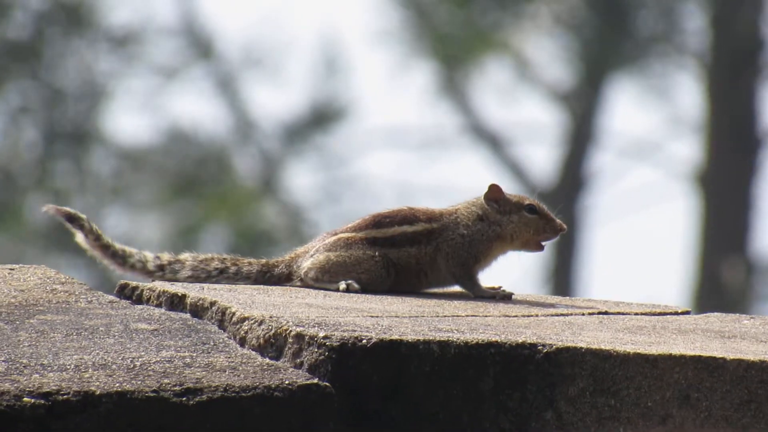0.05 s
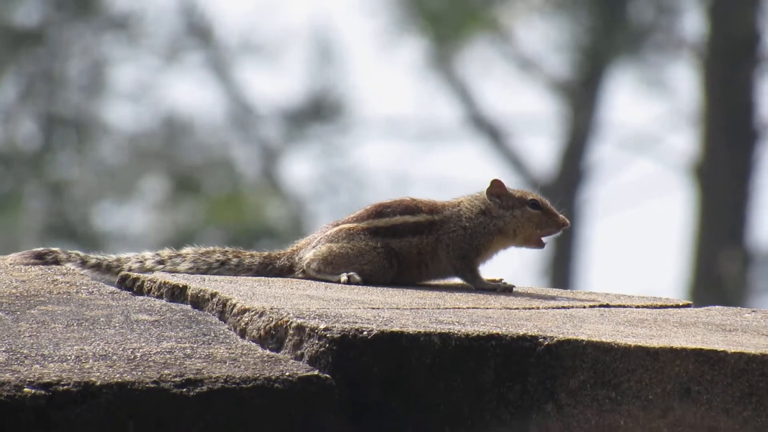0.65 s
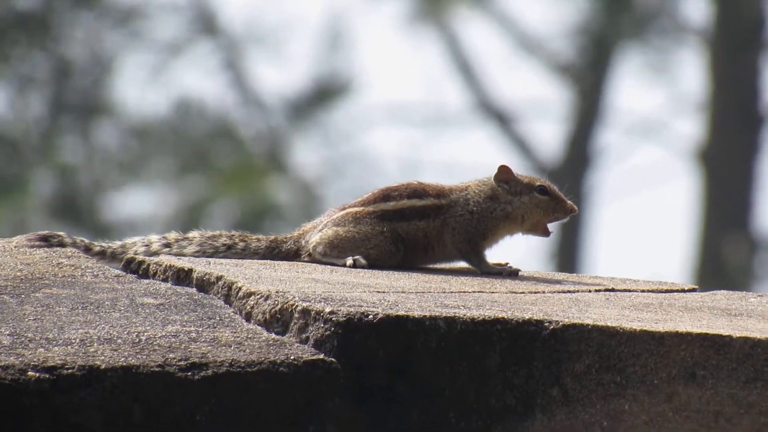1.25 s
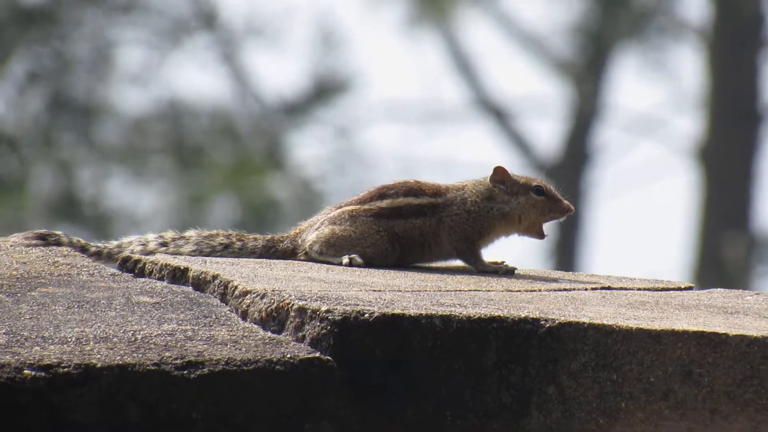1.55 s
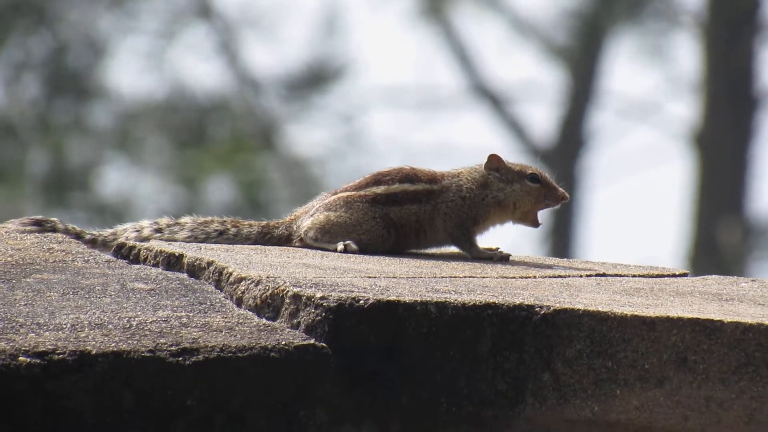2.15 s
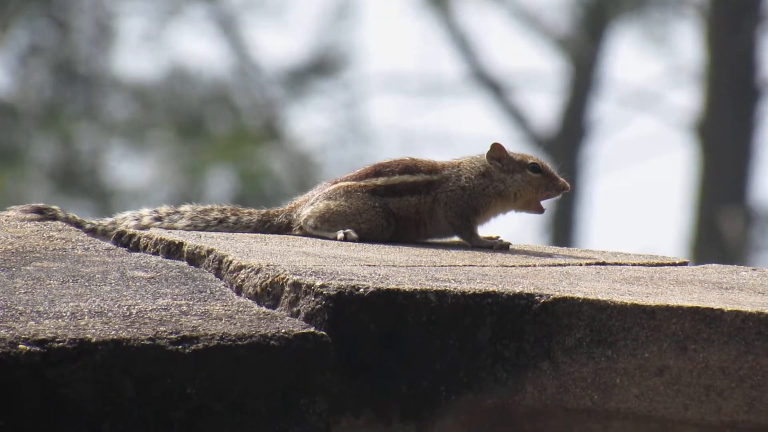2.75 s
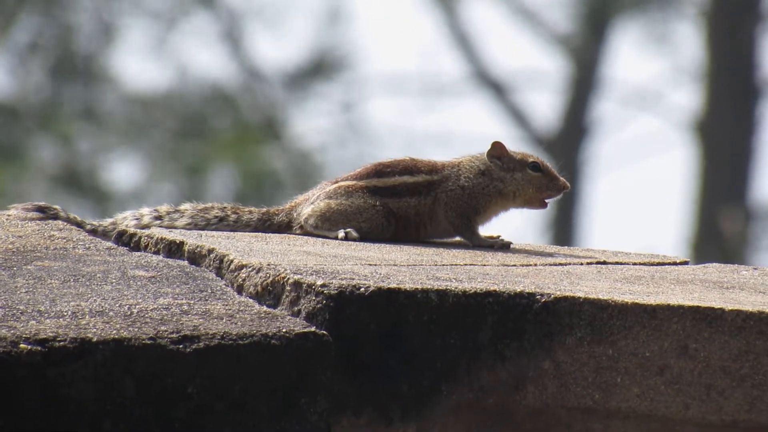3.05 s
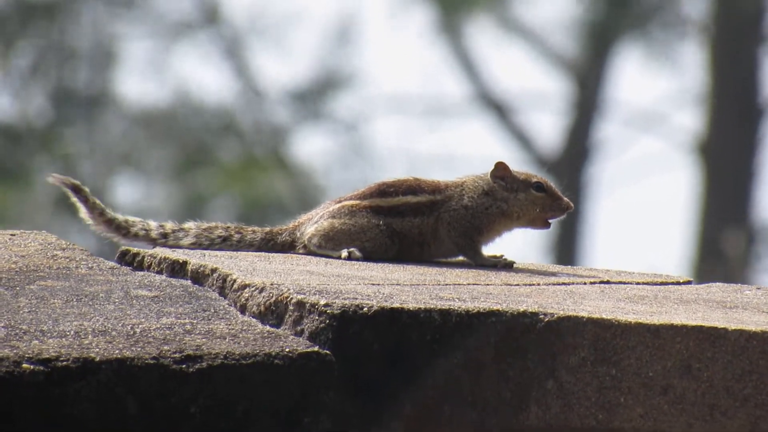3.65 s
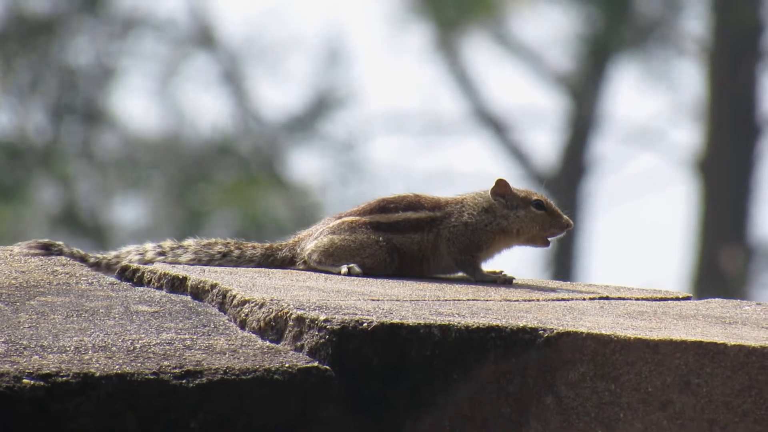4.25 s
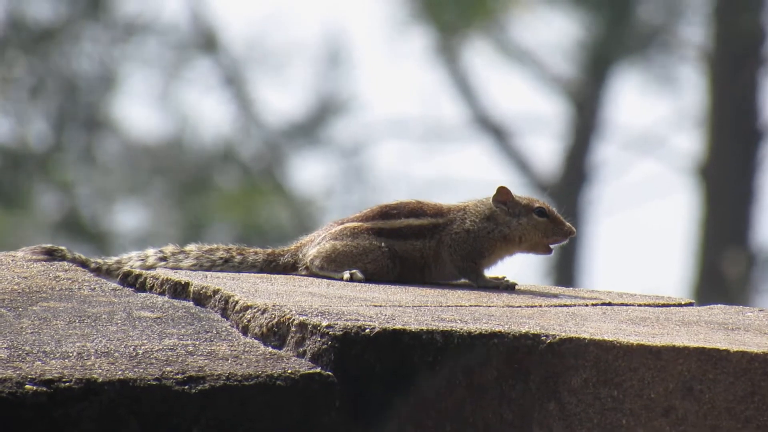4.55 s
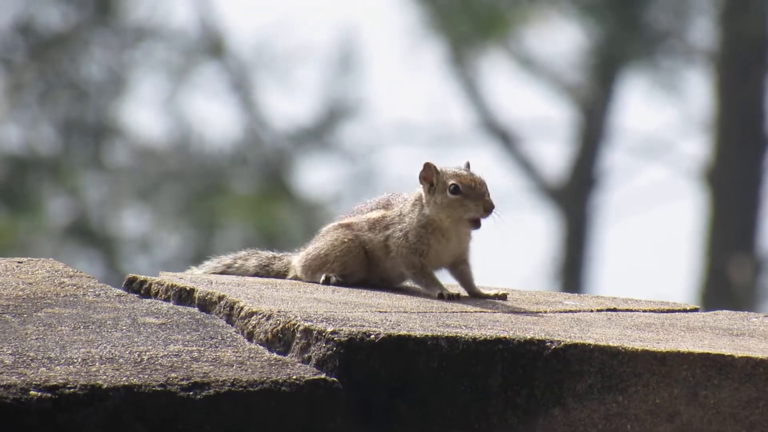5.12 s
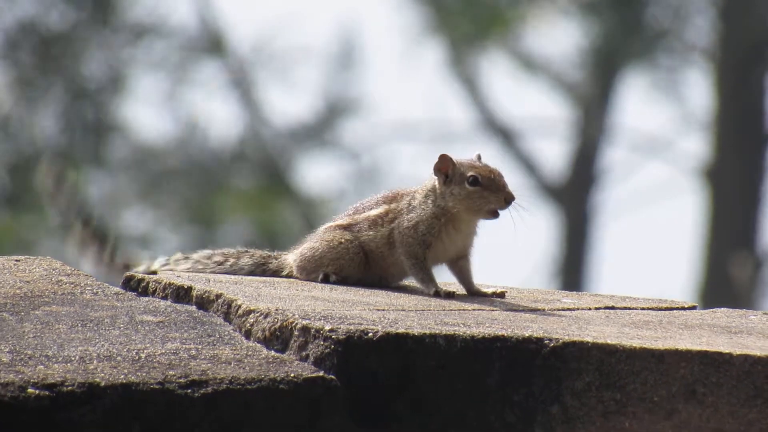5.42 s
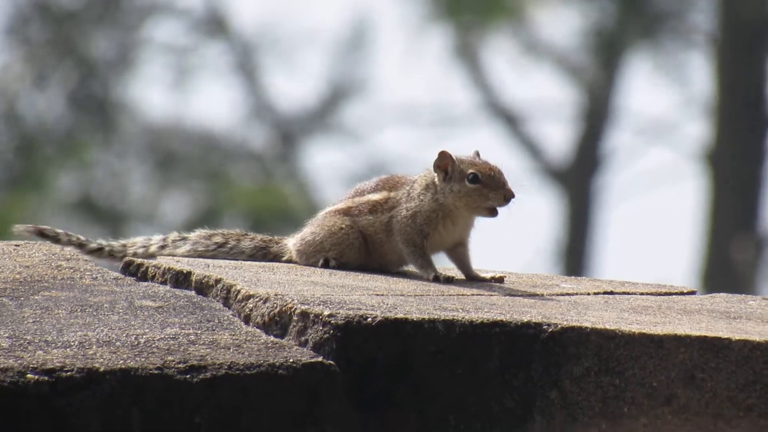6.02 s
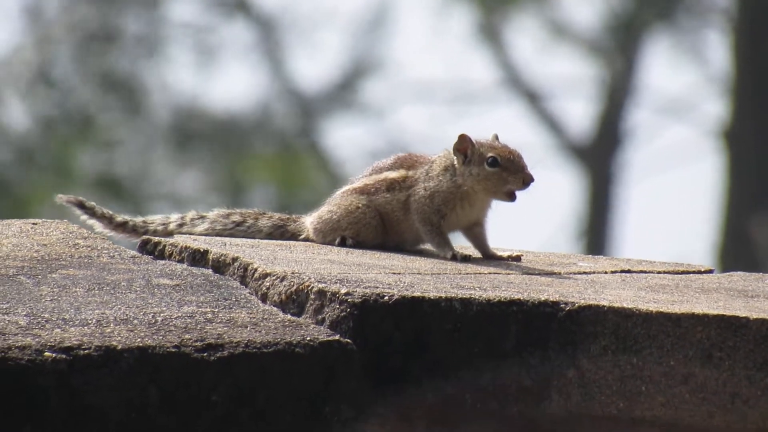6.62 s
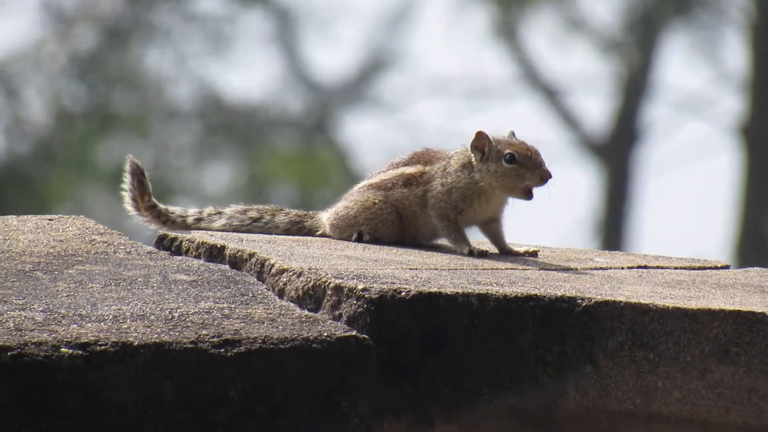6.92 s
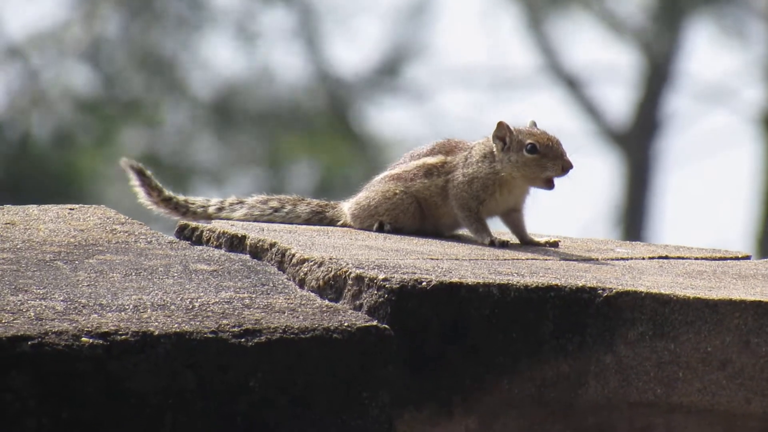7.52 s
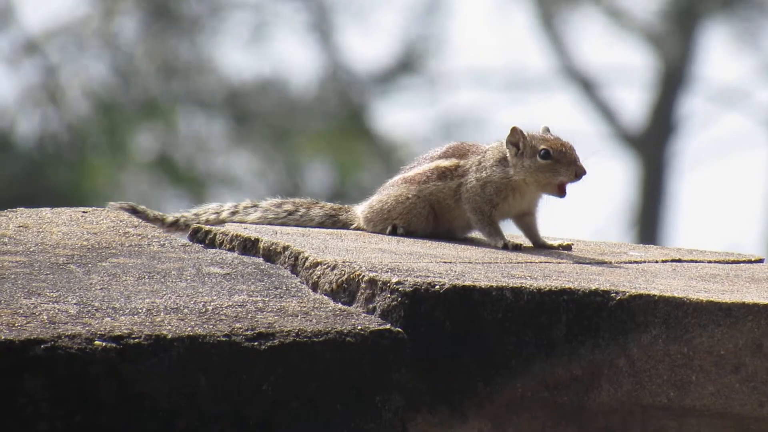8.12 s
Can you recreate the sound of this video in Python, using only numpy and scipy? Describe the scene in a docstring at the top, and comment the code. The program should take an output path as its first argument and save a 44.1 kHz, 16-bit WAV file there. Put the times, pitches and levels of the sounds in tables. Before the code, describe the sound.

High-pitched squirrel chirps repeat about three times a second over gusty wind rumble and a soft hiss.

```python
"""Palm squirrel in gusty wind

A palm squirrel on a stone ledge whistles about three chirps a second, each trailed by a faint squeak,
two of them by a sharp chip. Walls and trees reflect the calls; a far bird twitters, and three dry ticks
sound. Turbulent gusts buffet the microphone of a hissing, faintly whining camera."""
import sys
import numpy as np
from scipy import signal
from scipy.fft import rfft, irfft, next_fast_len
from scipy.io import wavfile

SR = 44100
rng = np.random.default_rng(int(sys.argv[2]) if len(sys.argv) > 2 else 0)


def persist_wave(psi):
    """Save psi, clipped to +-1, as 16-bit WAV."""
    counts = np.round(np.clip(psi, -1, 1) * 32767).astype(np.int16)
    wavfile.write(sys.argv[1], SR, np.atleast_2d(counts).T)


N = 369116

# Whistles. Each row: start in seconds, length in seconds, pitch in Hz, crest level in dB,
# closing fall as a fraction of the pitch.
WHISTLES = [(-0.025, .042, 4290, -37.5, 0.064), (0.265, 0.061, 4225, -42, 0.023),
            (.594, 0.06, 4232, -44, .014), (0.946, 0.046, 4120, -53.5, .03),
            (1.208, 0.058, 4204, -47.5, 0.012), (1.53, 0.058, 4176, -44, 0.013),
            (1.857, 0.061, 4162, -45.5, 0.036), (2.15, 0.062, 4186, -44.5, 0.034),
            (2.463, 0.064, 4200, -45, 0.035), (2.803, 0.06, 4164, -47, 0.0054),
            (3.145, .05, 4160, -52, .013), (3.475, 0.055, 4150, -51.5, 0.0044),
            (3.845, 0.041, 4140, -51.5, .006), (4.139, 0.058, 4225, -47.5, 0.044),
            (4.477, 0.052, 4190, -45.5, 0.051), (4.774, 0.057, 4365, -38, 0.13),
            (5.18, 0.054, 4435, -40, 0.19), (5.568, .05, 4340, -41, 0.145),
            (5.876, 0.066, 4250, -42.5, .083), (6.196, .063, 4237, -44, 0.062),
            (6.529, 0.058, 4200, -44, 0.047), (6.878, 0.052, 4110, -49, 0.023),
            (7.202, 0.04, 4074, -44.5, 0.017), (7.47, 0.056, 4180, -43, 0.071),
            (7.764, 0.064, 4194, -41.5, 0.059), (8.08, 0.06, 4186, -41, 0.039)]
# Reflections from hard surfaces. Each row: delay in seconds, gain in dB.
REFLECTIONS = [(.02001, -6), (.02743, -12), (.039, -19), (.067, -24)]
# Gusts. Each row: start in seconds, length in seconds, relative opening level in dB.
WIND_GUSTS = [(0.238, .3, -27), (0.63, 0.18, -33), (1.011, 0.15, -33.5), (1.35, .17, -31.5), (2, .13, -40),
              (2.305, 0.18, -38.5), (3.386, 0.15, -23.5), (3.965, 0.15, -26.5), (4.175, 0.38, -33),
              (4.542, 0.32, -29), (5.09, 0.28, -27), (5.513, 0.31, -34), (5.754, 0.23, -25),
              (6.089, 0.24, -19.5), (6.362, 0.21, -26.5), (6.72, 0.082, -32), (7.006, 0.073, -27),
              (7.409, 0.14, -17.5), (7.612, 0.31, -29)]
# Sudden buffets. Each row: time of the peak in seconds, relative level in dB.
WIND_BUFFETS = [(.245, -44), (.663, -29), (1.025, -39), (2.398, -27), (3.434, -18), (4.048, -22.5),
                (4.255, -32), (4.788, -32.5), (5.217, -20), (6.284, -17), (7.503, -25), (7.779, -20.5)]
# Bird notes. Each row: start and length in seconds, first and last nominal pitch in Hz, relative dB.
BIRD_NOTES = [(1.175, 0.035, 3580, 3600, -68), (1.298, 0.029, 3190, 3050, -63),
              (1.388, 0.037, 2920, 2700, -69), (1.456, 0.036, 2190, 2010, -68),
              (2.918, 0.047, 2130, 2420, -67), (2.953, 0.044, 2260, 2590, -63),
              (3.186, .03, 2540, 2350, -67), (3.257, 0.038, 2390, 2640, -65), (3.379, .03, 2740, 2710, -71),
              (3.412, 0.041, 2425, 2550, -67), (5.477, 0.064, 1910, 2670, -70)]
# Dry ticks. Each row: start in seconds, level in dB.
DRY_TICKS = [(4.41, -46.5), (4.451, -43.5), (4.994, -50.5)]
# Sharp chips. Each row: start in seconds, length in seconds, pitch in Hz, relative level in dB.
SHARP_CHIPS = [(4.889, 0.0124, 3486, -35.5), (5.2923, 0.013, 3560, -37)]

# Harmonic series. Each row: multiple of the pitch, relative level in dB.
SQUEAK_PARTIALS = [(1, 0), (2, -14), (3, 0), (4, -12), (5, -12), (6, -14)]
CHIP_PARTIALS = [(1, -6), (2, -5.5), (3, -20), (4, -26)]

# Noise spectra. Each row: frequency in Hz, relative level in dB.
COMMON_HISS = [(12, -16), (20, -6.5), (217, -4), (270, -7), (302, -7.5), (337, -7.5), (511, -13.5),
               (693, -16.5), (1020, -17), (2280, -25.5), (4080, -31.5), (4430, -32.5), (6360, -32),
               (15000, -35.5)]
OPPOSED_HISS = [(12, -25), (20, -5.5), (49, -9.5), (87, -13), (118, -20), (178, -7.5), (235, -9), (278, -9),
                (525, -15.5), (674, -23), (940, -22), (3270, -48), (15000, -48.5)]
LARGE_EDDIES = [(15, -25), (40, 2), (90, 5.5), (150, 0), (250, -11.5), (400, -23), (600, -37), (1000, -46),
                (3000, -82)]
SMALL_EDDIES = [(30, -9.5), (170, 7.5), (330, -5), (500, -18), (900, -45), (3000, -74)]
SQUEAK_RASP = [(1000, -4), (1600, 9.5), (2500, -11), (4700, 9.5), (5800, -43), (7200, -5), (9800, 0),
               (14000, -31)]
TICK_SPECTRUM = [(500, -30), (1200, -5), (1750, 4), (2400, -14), (3200, -14), (5500, -19), (10000, -37),
                 (15000, -35)]
CHIP_RASP = [(1500, -34), (2500, -1.5), (4800, -4), (6000, -12), (7200, 2.5), (9000, -14), (14000, -20)]


def amp(db):
    """Amplitude grows tenfold for every 20 dB."""
    return 10 ** (np.asarray(db) / 20)


def unit(x):
    """Normalisation to an rms of 1."""
    return x / np.sqrt(np.mean(x ** 2) + 1e-20)


def add(mix, start, sound):
    """Superposition: a sound joins the mix at a start time in seconds."""
    first = round(start * SR)
    sound = sound[max(-first, 0):]
    part = mix[max(first, 0):][:len(sound)]
    part += sound[:len(part)]


def noise(spectrum):
    """Spectral shaping turns white noise into coloured noise of rms 1."""
    hz, db = np.transpose(spectrum)
    gain = amp(np.interp(np.log(np.fft.rfftfreq(N, 1 / SR) + 1), np.log(hz), db))
    return unit(irfft(rfft(rng.standard_normal(N)) * gain, N))


def wander(rate_hz):
    """Low-pass filtering turns noise into a smooth fluctuation of rms 1."""
    gain = np.exp(-(np.fft.rfftfreq(N, 1 / SR) / rate_hz) ** 2)
    return unit(irfft(rfft(rng.standard_normal(N)) * gain, N))


def course(length):
    """Normalised time, from 0 to 1 over one note."""
    return np.arange(0, length, 1 / SR) / length


def under(x, start, note):
    """Time windowing: the part of a long signal that lies under a note."""
    return np.take(x, round(start * SR) + np.arange(len(note)), mode="wrap")


def voice(hz, partials):
    """Additive synthesis: partials (multiple, dB rms) follow one phase, the integral of frequency."""
    phase = 2 * np.pi * np.cumsum(hz) / SR
    return np.sqrt(2) * sum(amp(db) * np.sin(k * phase) for k, db in partials)


def spread(mid, side):
    """Left and right are the sum and difference of a common and an opposed part."""
    return np.array([mid + side, mid - side])


def chirps(calm_hz=4240, shrill_hz=4407, attack_s=.005, crest_s=.041, release_s=.006):
    """Harmonic whistles swell, hold and drop; strain at high pitch brings jitter and period doubling."""
    out, tremble, flutter = np.zeros(N), wander(rate_hz=410), wander(rate_hz=130)
    for start, length, hz, db, fall in WHISTLES:
        u = course(length)
        t = u * length
        strain = np.clip((hz - calm_hz) / (shrill_hz - calm_hz), 0, 1) ** 2
        scoop = (.012 + .094 * strain) * np.exp(-t / .00856)  # a strained chirp starts lower
        sag = fall * np.exp((u - 1) / (.0826 + fall))  # a deeper fall starts sooner
        jitter = (.0004 + .0073 * strain) * under(tremble, start, u)
        doubling_db = -21 + 20 * np.log10(strain + 1e-3)
        octave_db = -4 - .18 * (db + 46.5) - 3 * strain  # louder chirps are purer
        third_db = octave_db - 19 + strain
        partials = [(1, 0), (2, octave_db), (3, third_db), (.5, doubling_db - 12.5), (1.5, doubling_db)]
        tone = voice(hz * (1 - scoop - sag + jitter), partials)
        swell_db = -(12 + 8 * strain) * np.maximum(1 - t / crest_s, 0) ** 1.3
        fade_db = -260 * np.maximum(t - crest_s, 0)
        level = amp(db + swell_db + fade_db + 1.5 * under(flutter, start, u))
        attack = np.sin(np.pi / 2 * np.minimum(t / attack_s, 1))
        release = np.sin(np.pi / 2 * np.minimum((length - t) / release_s, 1))
        add(out, start, tone * level * attack * release)
    return out


def echoes(x):
    """Interference: delayed reflections beat against the direct sound as its pitch slides."""
    size = next_fast_len(N + SR // 4)
    hz = np.fft.rfftfreq(size, 1 / SR)
    response = 1 + sum(amp(db) * np.exp(-2j * np.pi * hz * delay) for delay, db in REFLECTIONS)
    return irfft(rfft(x, size) * response, size)[:N]


def scatter(x, t60, dull_hz=6000, onset_s=.0039):
    """Diffuse reflections decay exponentially, different at each ear and dulled by leaves."""
    t = np.arange(SR) / SR
    tail = rng.standard_normal((2, SR)) * amp(-60 * t / t60) * np.clip(t / onset_s - 1, 0, 1)
    tail = signal.lfilter(*signal.butter(2, dull_hz, fs=SR), tail / np.linalg.norm(tail[0]))
    return signal.fftconvolve(x[None], tail, axes=1)[:, :N]


def hiss_and_whine(whine_hz=15735, throb_hz=13.5):
    """Stationary outdoor and microphone noise; amplitude modulation makes the camera's whine throb."""
    throb = 1 + np.cos(2 * np.pi * throb_hz * np.arange(N) / SR) / 2
    whine = amp(-69) * throb * voice(np.full(N, whine_hz), [(1, 0)])
    return spread(amp(-56) * noise(COMMON_HISS) + whine, amp(-47) * noise(OPPOSED_HISS))


def airflow(breeze_db=-46.5, rise_s=.022, sag_db=7, fall_s=.022):
    """Breeze and gusts add in power; each gust arrives quickly, slackens and drops."""
    t = np.arange(N) / SR
    power = amp(breeze_db) ** 2
    for start, length, db in WIND_GUSTS:
        early, late = np.maximum(start - t, 0), np.maximum(t - start - length, 0)
        edges = np.exp(-(early / rise_s) ** 2 - late / fall_s)
        level = amp(db - sag_db * np.clip((t - start) / length, 0, 1))
        power = power + (edges * level) ** 2
    return np.sqrt(power)


def wind(mid_db=-14, side_db=-1, buffet_s=.0074):
    """Turbulence pushes the two microphone ports unequally; strong gusts carry smaller, higher eddies."""
    t = np.arange(N) / SR
    gust_db = 20 * np.log10(airflow())
    push = amp(gust_db + 2 * wander(rate_hz=38))
    buffets = sum(amp(db) * np.exp(-((t - peak) / buffet_s) ** 2) for peak, db in WIND_BUFFETS)
    fine_push = buffets + push * amp(4.75 + .5 * gust_db)
    mid, side = (push * noise(LARGE_EDDIES) + fine_push * noise(SMALL_EDDIES) for _ in range(2))
    return spread(amp(mid_db) * mid, amp(side_db) * side) * amp([[.4], [-.4]])


def squeaks(high_hz=2150, low_hz=1380, gap_s=.018, after_chip_s=.017):
    """A rasping downward glide follows every call; a strong third harmonic makes it reedy."""
    out, tremble, rasp = np.zeros(N), wander(rate_hz=1400), noise(SQUEAK_RASP)
    starts = [start + length + gap_s for start, length, *_ in WHISTLES]
    starts += [start + after_chip_s for start, *_ in SHARP_CHIPS]
    for start in starts:
        u = course(length=.014)
        glide = low_hz + (high_hz - low_hz) * (1 - u) ** 1.71
        pitch = glide * (1 + .027 * under(tremble, start, u))
        add(out, start, amp(-61) * voice(pitch, SQUEAK_PARTIALS) * np.sin(np.pi * u))
        u = course(length=.04)
        add(out, start, amp(-68) * under(rasp, start, u) * np.sqrt(np.sin(np.pi * u)))
    return out


def bird(detune=.97):
    """Thin, gliding pure tones waver by random frequency modulation."""
    out, tremble = np.zeros(N), wander(rate_hz=320)
    for start, length, first_hz, last_hz, db in BIRD_NOTES:
        u = course(length)
        glide = first_hz + (last_hz - first_hz) * u
        pitch = detune * glide * (1 + .014 * under(tremble, start, u))
        add(out, start, voice(pitch, [(1, db)]) * np.sin(np.pi * u))
    return out


def ticks(t60=.029):
    """Heavy damping: light knocks are noise bursts that fall 60 dB in t60 seconds."""
    out, body, t = np.zeros(N), noise(TICK_SPECTRUM), np.arange(SR // 10) / SR
    for start, db in DRY_TICKS:
        add(out, start, amp(db - 60 * t / t60) * under(body, start, t))
    return out


def chips(catch_hz=2430, lead_s=.0083, fall=.073):
    """A pitch jump: the voice catches on a low, rough note, then leaps to a short, bright one."""
    out, rasp = np.zeros(N), noise(CHIP_RASP)
    for start, length, hz, db in SHARP_CHIPS:
        u = course(length)
        bright = voice(hz * (1 - fall * u ** 3), CHIP_PARTIALS)
        add(out, start, amp(db) * bright * signal.windows.tukey(len(u), .5))
        u = course(length=.009)
        catch = voice(catch_hz * (1.04 - .095 * u), [(1, -4.5), (2, -27)])
        add(out, start - lead_s, amp(db - 10) * catch * np.sin(np.pi * u))
        u = course(length=.024)
        add(out, start - 2 * lead_s, amp(db - 13) * under(rasp, start, u) * np.sin(np.pi * u))
    return out


def scene():
    """Direct and reflected sound superpose: squirrel in front, bird far back, wind over all."""
    squirrel = chirps() + squeaks() + chips()
    song, taps = bird(), ticks()
    walls = amp(-8) * scatter(squirrel + taps, t60=.14, dull_hz=11700, onset_s=.01)
    trees = amp(-16.5) * scatter(squirrel, t60=.9, onset_s=.03)
    near = (echoes(squirrel) + taps) * amp([[.3], [-.3]])  # slightly to the left
    distant = amp(1.5) * song + amp(-5) * scatter(song, t60=.27)
    return near + walls + trees + distant + wind() + hiss_and_whine()


def record(dry, notch_hz=695, width_hz=210, cutoff_hz=15900):
    """Linear filtering: the camera cuts a notch in the low middle and limits the band."""
    notched = signal.lfilter(*signal.iirnotch(notch_hz, notch_hz / width_hz, SR), dry)
    lowpass = signal.firwin(1023, cutoff_hz, window=("kaiser", 9), fs=SR)
    return signal.oaconvolve(notched, lowpass[None], "same")


dry = scene()
out = record(dry)
persist_wave(out)
```